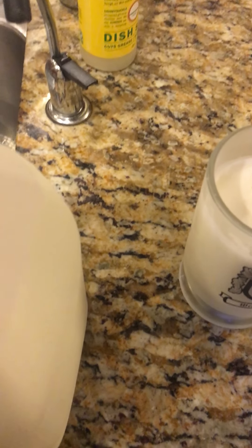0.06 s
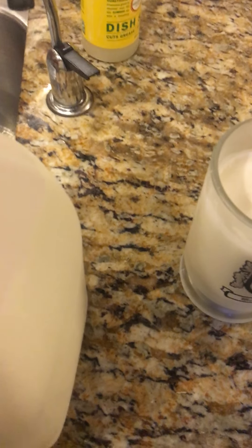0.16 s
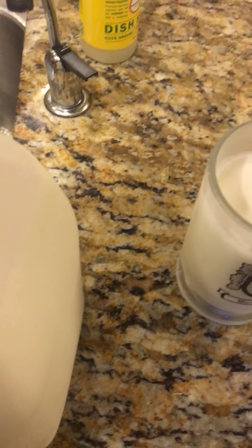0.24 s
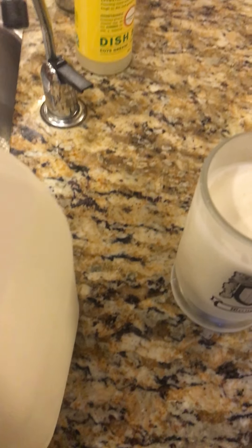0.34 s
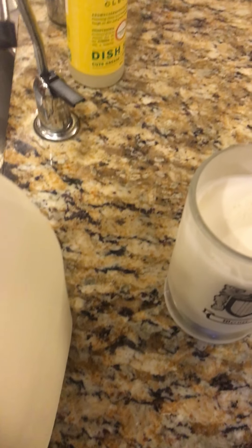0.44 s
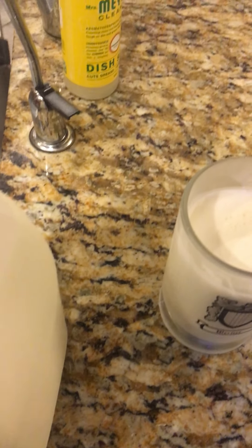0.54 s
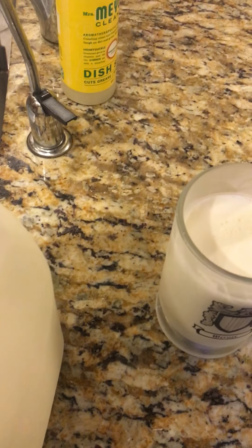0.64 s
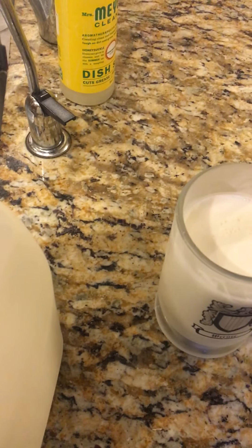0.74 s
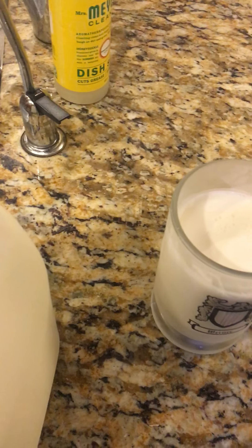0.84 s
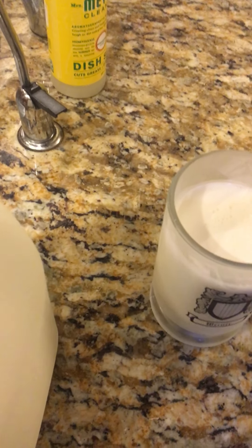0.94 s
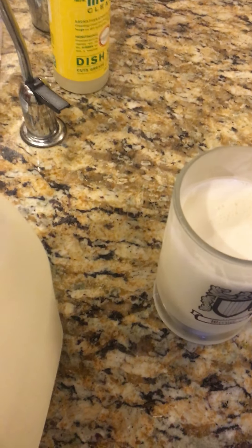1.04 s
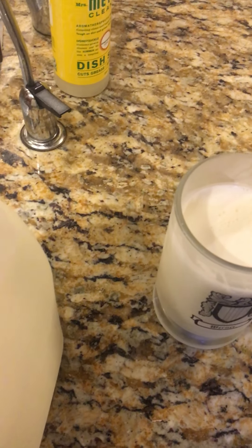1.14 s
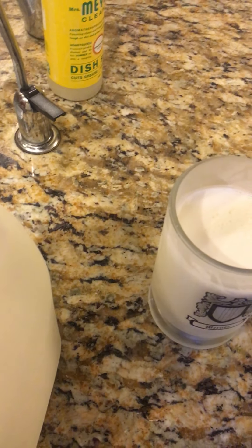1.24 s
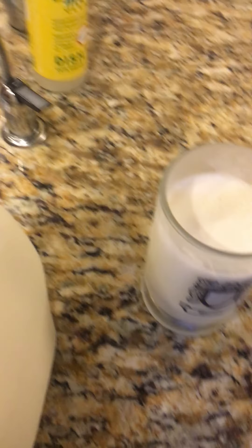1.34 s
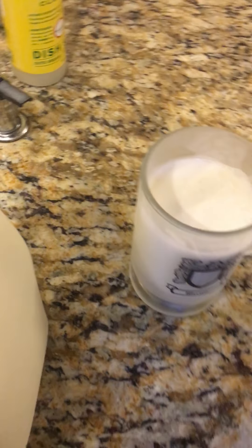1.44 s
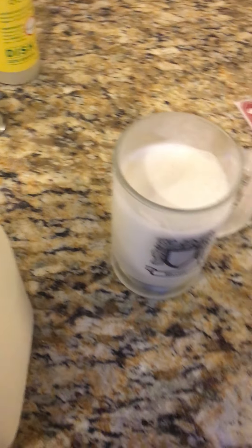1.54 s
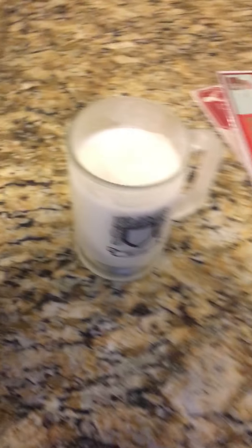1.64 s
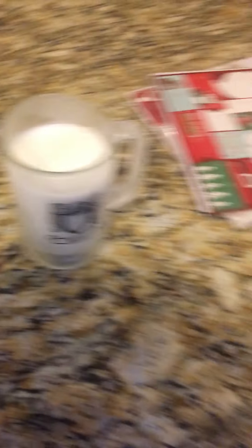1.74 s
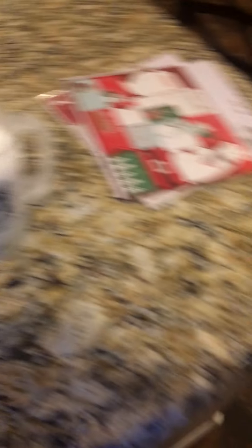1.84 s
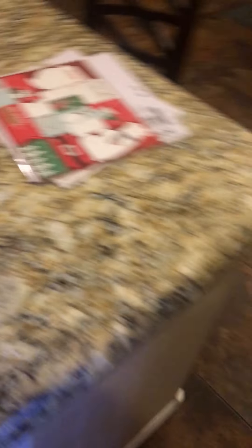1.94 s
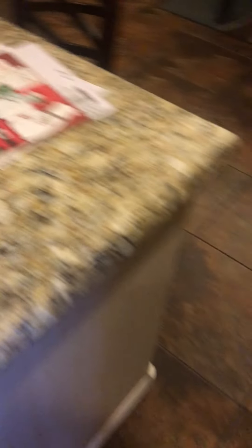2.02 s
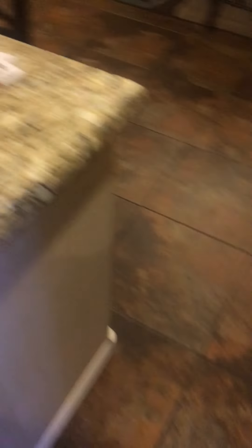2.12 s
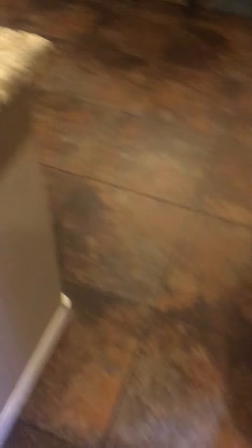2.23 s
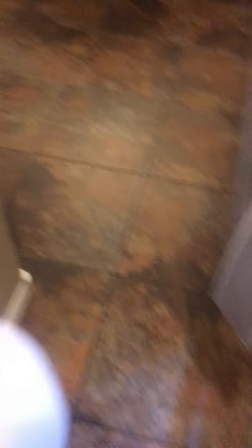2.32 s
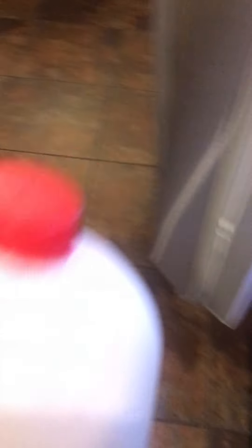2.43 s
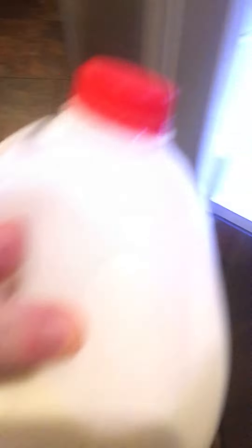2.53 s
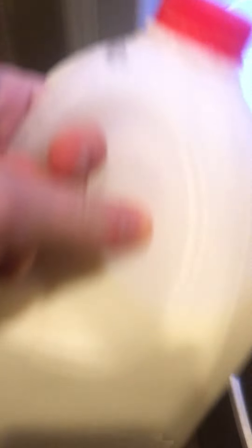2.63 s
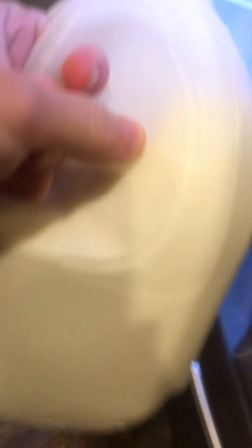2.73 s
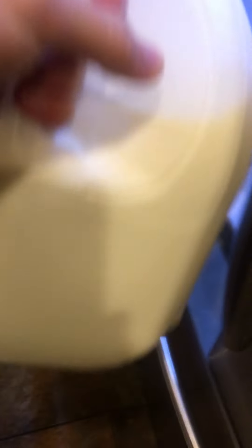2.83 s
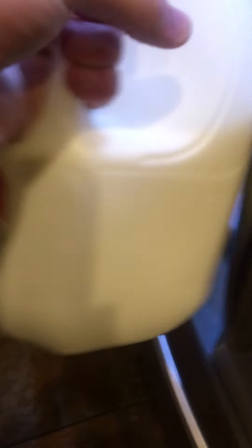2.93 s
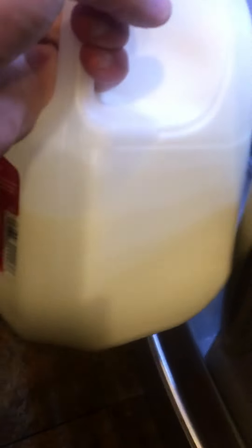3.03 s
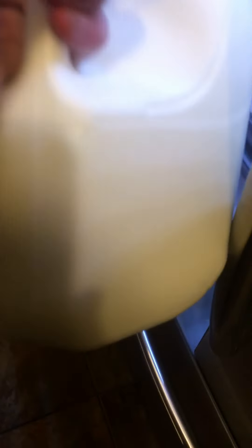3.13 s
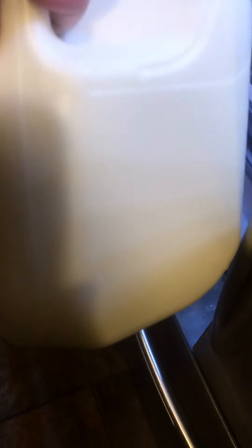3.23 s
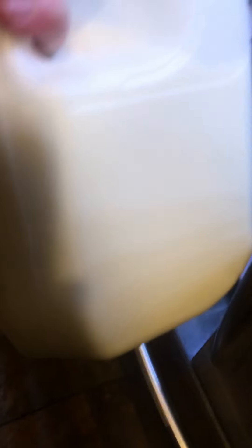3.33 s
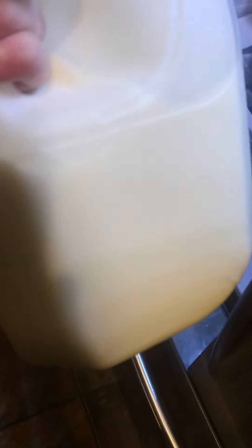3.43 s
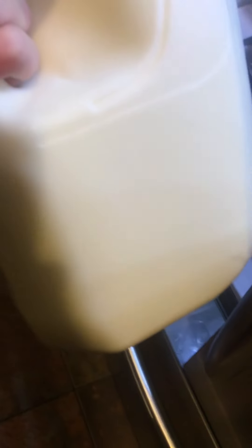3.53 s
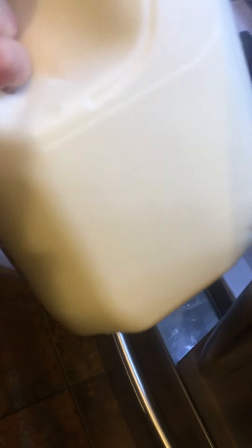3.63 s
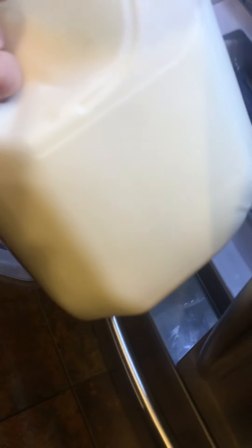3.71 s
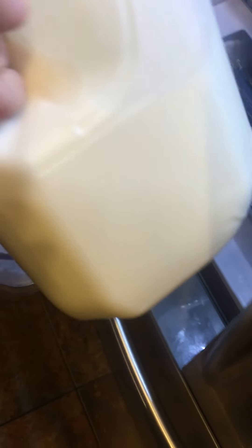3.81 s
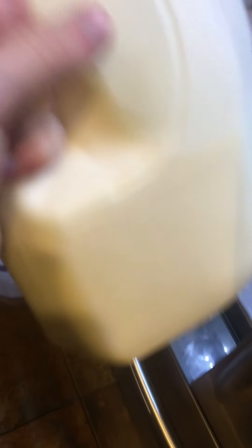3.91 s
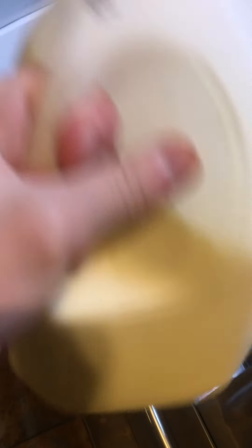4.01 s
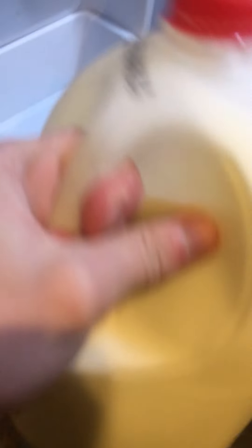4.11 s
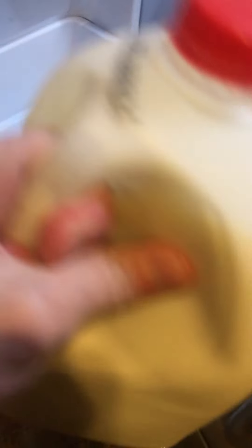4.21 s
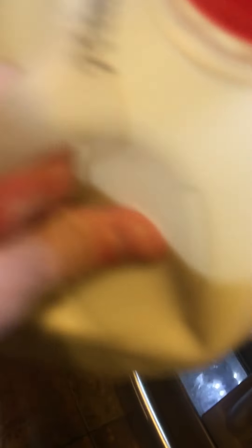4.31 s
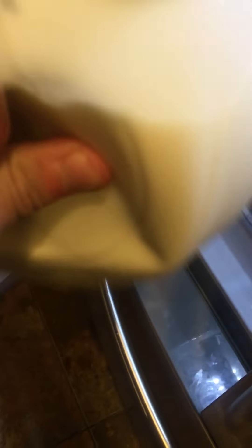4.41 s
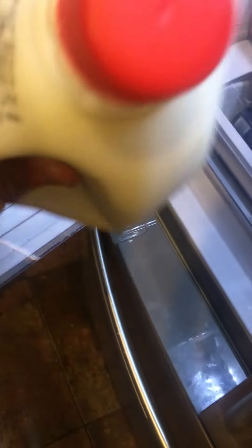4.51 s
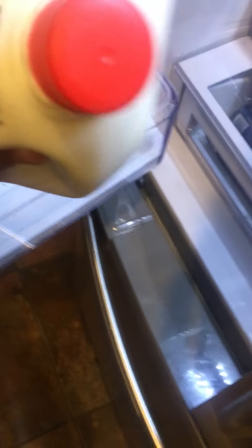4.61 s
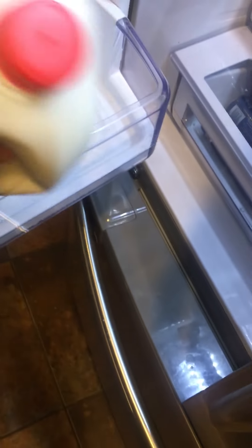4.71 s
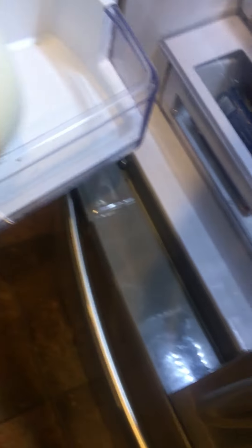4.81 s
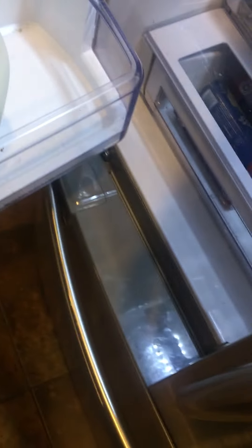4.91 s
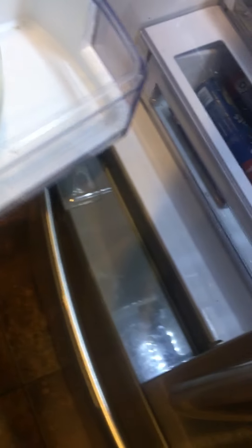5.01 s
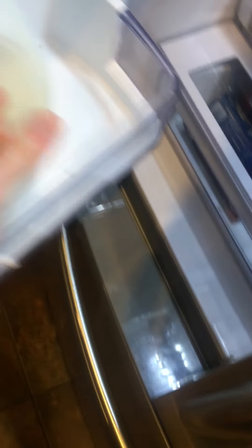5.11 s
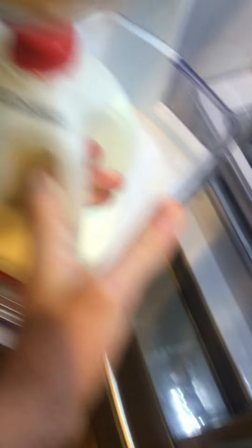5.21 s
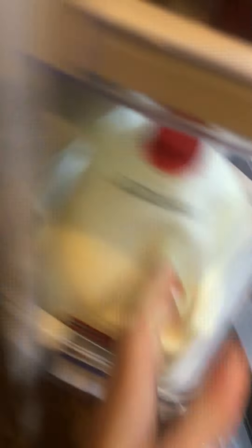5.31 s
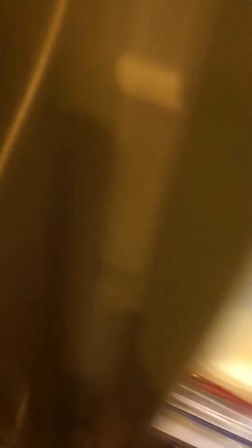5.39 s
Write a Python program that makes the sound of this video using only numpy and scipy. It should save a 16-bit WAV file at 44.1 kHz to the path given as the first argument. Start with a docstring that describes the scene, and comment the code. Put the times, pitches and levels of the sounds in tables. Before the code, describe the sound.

In a kitchen, a plastic milk jug gives one sharp crack as it is capped, followed by faint rubbing and small taps. After a lone hollow pop, loud clusters of knocks and cracks come as the jug is handled and its wall buckles, with one brief squeak. It then scrapes and clatters into a fridge door shelf. Everything is close, over a low hum and some microphone handling rumble.

```python
"""Tiled kitchen: a full plastic milk jug is capped on a stone counter, carried across the room and
shoved into a fridge door shelf. Each knock is a short flurry of contacts that rings jug wall and shelf.
The wall pops and cracks as it buckles; small parts ring and squeak; skin and plastic rub in dense grains.
Behind: a short room tail, a low hum, and rumble from the hand that holds the microphone."""
import sys
import numpy as np
from scipy import signal
from scipy.fft import rfft, irfft, next_fast_len
from scipy.io import wavfile

SR = 44100
rng = np.random.default_rng(int(sys.argv[2]) if len(sys.argv) > 2 else 0)


def store_wav(level_fs):
    """Save 16-bit WAV to argv[1]."""
    pcm = np.round(np.clip(np.atleast_2d(level_fs), -1, 1) * 32767)
    wavfile.write(sys.argv[1], SR, pcm.T.astype(np.int16))


N = 240457

# Hum spectrum: f/Hz, relative density/dB
HUM_SPECTRUM = [(25, -15), (60, 2), (120, 6.5), (250, -24), (500, -29), (1100, -25), (2500, -43),
                (5000, -31.5), (9000, -33.5), (13000, -29.5), (16000, -33.5)]
# Hand jolts on the microphone: t/s, level/dB
HAND_JOLTS = [(.1, -39), (2.0, -56), (2.25, -41), (2.552, -54.5), (2.868, -24.5), (3.2, -39.5), (3.5, -35),
              (4.0, -47), (4.149, -29), (4.6, -38), (4.8, -50), (5.09, -38), (5.28, -41), (5.39, -47)]
# Kitchen decay: f/Hz, t60/s
ROOM_DECAY = [(100, 0.81), (500, 0.5), (1500, 0.45), (4000, 0.45), (12000, 0.3)]
# Wall modes of jug and shelf: f/Hz, width/Hz, relative gain/dB
WALL_MODES = [(172, 39, 10.5), (274.6, 12, 8.5), (377.5, 6.5, 0.5), (601.5, 18, 5), (856, 56, -0.5),
              (1062, 170, 3), (1250, 30, 2), (1538, 25, -6), (2860, 23, -14), (3730, 25, -5),
              (6450, 490, -9.5)]
# Brushes of skin and cloth: t/s, length/s, scrape/dB, hiss/dB
BRUSH_STROKES = [(0.038, 0.063, -88, -51.5), (0.304, 0.12, -53.5, -72.5), (0.546, 0.05, -54.5, -60),
                 (0.615, 0.12, -56, -61.5), (0.818, 0.015, -61, -59.5), (1.047, 0.051, -63, -61),
                 (1.11, 0.18, -63, -65.5), (1.245, 0.19, -51.5, -49), (1.431, 0.051, -56, -56),
                 (1.579, 0.068, -54.5, -50.5), (1.637, 0.24, -50.5, -50.5), (1.713, 0.064, -62, -51),
                 (2.009, 0.047, -51.5, -54), (2.402, 0.038, -77, -60), (2.697, 0.081, -58, -58),
                 (4.692, 0.13, -30, -32), (5.054, 0.083, -54, -41.5)]
# Rubbing and sliding envelope: t/s, scrape/dB, rumble/dB
RUB_LEVELS = [(0.0, -60, -63.5), (0.12, -44, -58.5), (0.24, -46.5, -64), (0.41, -59.5, -66),
              (1.02, -77.5, -66.5), (1.64, -63, -64.5), (1.99, -69, -60.5), (2.28, -71, -62),
              (2.41, -57.5, -64.5), (2.7, -76.5, -70.5), (2.91, -60, -61.5), (3.03, -44, -33.5),
              (3.07, -35.5, -36), (3.23, -54, -41), (3.55, -54, -53), (3.76, -48.5, -43.5),
              (3.98, -49, -41), (4.14, -51, -34), (4.36, -61.5, -62.5), (4.6, -89, -68), (4.78, -33.5, -31),
              (4.89, -31, -31.5), (4.98, -35.5, -29.5), (5.18, -45.5, -40), (5.34, -48.5, -42),
              (5.45, -62, -58)]
# Rubbing hiss spectrum: f/Hz, relative density/dB
HISS_SPECTRUM = [(1800, -49.5), (3000, 8), (5000, 3.5), (8000, -7.5), (12000, -3.5), (15500, -12)]
# Rings and squeaks of small parts: t/s, f/Hz, level/dB, length/s, t60/s
PART_RINGS = [(.655, 910, -47, .03, .2), (1.59, 1230, -47, .04, .2), (2.9, 2088, -18, .062, .6),
              (3.015, 2088, -35, .03, .5), (4.4, 2686, -67, .12, 3.0), (4.568, 490, -40, .02, .2),
              (4.64, 662, -42, .035, .25), (5.233, 1170, -25, .024, .2)]
# Cracks of the plastic: t/s, level/dB, centre f/Hz
PLASTIC_CRACKS = [(.0927, -9, 7000), (.531, -55, 8000), (.5846, -40, 6000), (.601, -46, 7000),
                  (.6913, -47, 7000), (.8345, -42, 3500), (.857, -46, 4000), (2.857, -42, 8000),
                  (2.875, -18, 7000), (2.912, -22, 5000), (2.9671, -15, 4000), (3.0524, -24, 4500),
                  (3.106, -30, 9000), (3.1182, -25, 8800), (3.1302, -23, 4000), (3.5062, -23, 4500),
                  (3.5421, -30, 2200), (3.5576, -32, 6000), (4.047, -22, 5500), (4.249, -37, 6400),
                  (4.4047, -48, 6000), (4.746, -24, 4000), (4.8455, -18, 9000), (4.8829, -22, 4000),
                  (4.9068, -24, 7000), (4.9405, -18, 6000), (5.025, -30, 2500), (5.091, -26, 2500),
                  (5.1114, -36, 7000)]
# Buckling pops of the jug wall: t/s, level/dB, f/Hz, t60/s
WALL_POPS = [(0.835, -41.5, 1530, 0.025), (2.25, -10, 785, 0.028), (2.248, -16.5, 1500, 0.045),
             (2.25, -18, 486, 0.044), (2.249, -20, 2150, 0.03), (2.249, -26, 2750, 0.03),
             (2.553, -29.5, 880, 0.016), (3.49, -21.5, 332, 0.047), (3.507, -20.5, 743, 0.0285),
             (3.977, -8, 688, 0.065), (3.98, -10, 480, 0.087), (3.979, -9.5, 2974, 0.037),
             (5.089, -22.5, 421, 0.081), (2.894, -2, 966, 0.022), (2.913, -14.5, 261, 0.075),
             (3.116, -18, 280, 0.09), (3.217, -17, 400, 0.061), (3.84, -24, 349, 0.11),
             (4.021, -7, 416, 0.06), (4.051, -8.5, 1145, 0.034), (4.064, -18.5, 1077, 0.067),
             (4.548, -25, 876, 0.034), (4.235, -27, 1040, 0.056), (4.116, -17, 241.6, 0.1),
             (4.136, -3, 1075, 0.0081), (4.205, -20, 237, 0.17), (4.861, -12.5, 184, 0.085),
             (4.958, -19, 313, 0.077)]
# Knocks: t/s, level/dB, thud/dB, snap/dB, tick/dB (these three re level), base t60/s
JUG_KNOCKS = [(0.0945, -3, -26, -5, -17, 0.054), (0.537, -49.5, -24, -12, -10, 0.075),
              (0.586, -40.5, -25, 1.5, -3.5, 0.034), (0.598, -50, -9, -8, -4.5, 0.063),
              (0.692, -51, -7, -6.5, -7, 0.056), (0.836, -34.5, -34, -3, -24, 0.029),
              (0.857, -55, -12, 5, -3, 0.046), (0.948, -46.5, -17, 5.5, -12, 0.042),
              (1.308, -33, -19, -5, -20, 0.051), (1.505, -38, -9, 3.5, -11.5, 0.056),
              (1.541, -37.5, -14, -4, -25, 0.045), (1.789, -34, -21.5, -7, -27, 0.074),
              (1.831, -37, -18.5, 3.5, -14.5, 0.035), (2.25, -15, -6, -34, -43.5, 0.029),
              (2.553, -29.5, -8.5, -1, -8, 0.019), (2.866, -26.5, -3, -6, -18, 0.14),
              (2.874, -8.5, -8.5, -5.5, -10, 0.053), (2.893, -13, -11, -4, -15, 0.098),
              (2.91, -10.5, 0.5, -8, -26, 0.13), (2.963, -3.5, -14, -5.5, -19, 0.096),
              (2.984, -13.5, -5, -7, -13, 0.072), (3.053, -16, -18, -6, -19.5, 0.1),
              (3.132, -20.5, -4, 0, -15, 0.072), (3.155, -23, -20, -3.5, -14, 0.075),
              (3.212, -26, -5.5, -9, -23, 0.083), (3.382, -39.5, -2, -5, -15, 0.072),
              (3.49, -20.5, -11.5, -8, -33, 0.048), (3.506, -17.5, -20, -4.5, -23, 0.057),
              (3.543, -29, -10, -6, -28, 0.056), (3.557, -32, -11, 4.5, -11, 0.078),
              (3.839, -27, -1, -9, -26, 0.049), (3.975, 0, -14, -6.5, -21.5, 0.063),
              (4.013, -14, -5.5, -6, -24, 0.077), (4.045, -13, -37, -0.5, -26.5, 0.056),
              (4.093, -31, -12, -21, -21, 0.032), (4.113, -26.5, 2.5, -4, -7.5, 0.073),
              (4.14, -32.5, 4.5, -14, -26, 0.024), (4.198, -40.5, 11.5, 9.5, -1.5, 0.065),
              (4.223, -30, -1.5, -3, -12, 0.045), (4.238, -21, -5, -19, -29, 0.052),
              (4.249, -28.5, -3, -18, -19, 0.051), (4.281, -34.5, -6, -2, -13.5, 0.088),
              (4.366, -52.5, 6, -6, -0.5, 0.056), (4.384, -45, -4.5, 10, 0.5, 0.04),
              (4.444, -50.5, -1, -8.5, -13, 0.039), (4.515, -60, 1.5, 10, 0, 0.11),
              (4.546, -33, -11.5, -2.5, -32.5, 0.059), (4.564, -38, -2.5, 6, -11, 0.055),
              (4.612, -28, -9, -1.5, -18, 0.043), (4.636, -35.5, -21, 1.5, -18, 0.066),
              (4.696, -28.5, -4, 5, -5, 0.056), (4.849, -7.5, -4.5, -7, -13, 0.054),
              (4.885, -13.5, -8, 2.5, -15, 0.044), (4.909, -15, -2.5, -13, -12.5, 0.049),
              (4.933, -8, -6, -6.5, -17.5, 0.069), (4.955, -7.5, -6.5, -10, -19, 0.076),
              (4.984, -14.5, -11, -20, -22, 0.053), (5.023, -22.5, 4, -4, -19, 0.052),
              (5.091, -20, -3, -9, -22, 0.061), (5.122, -27, -18, -19, -22, 0.064),
              (5.235, -33, -5.5, -2, -16, 0.17), (5.266, -28, -6, 3, -2, 0.084),
              (5.298, -27.5, -14.5, -1.5, -19, 0.065), (5.344, -36.5, -5, -1, -10, 0.069),
              (5.396, -27, -1, -9, -22, 0.04), (5.408, -34.5, -20, -1, -6.5, 0.037)]
# Microphone response: f/Hz, gain/dB
MIC_RESPONSE = [(20, -15), (45, 0), (120, -1.5), (3000, -4.5), (4900, -7), (5800, 0), (7400, -1.5),
                (8500, 0), (10500, -6), (12500, -5), (15500, -7)]


def from_db(db):
    """dB to gain."""
    return 10 ** (np.asarray(db) / 20)


def unit_rms(x):
    """Scale to rms 1."""
    return x / np.sqrt(np.mean(x ** 2) + 1e-20)


def at_hz(table, hz):
    """Interpolate an (f/Hz, value) table over log frequency."""
    table_hz, values = np.transpose(table)
    return np.interp(np.log(hz + 1), np.log(table_hz), values)


def band(x, low_hz, high_hz):
    """Causal band-pass; keeps the rms of white noise."""
    sos = signal.butter(3, [low_hz, high_hz], "band", fs=SR, output="sos")
    return signal.sosfilt(sos, x + 1e-18) * np.sqrt(SR / 2 / (high_hz - low_hz))


def coloured(x, spectrum):
    """Zero-phase filter from an (f/Hz, gain/dB) table."""
    size = next_fast_len(N)
    gain = from_db(at_hz(spectrum, np.fft.rfftfreq(size, 1 / SR)))
    return irfft(rfft(x, size) * gain, size)[:N]


def resonance(x, hz, width_hz):
    """One mode, peak gain 1."""
    r = np.exp(-np.pi * width_hz / SR)
    feedback = [1, -2 * r * np.cos(2 * np.pi * hz / SR), r * r]
    return signal.lfilter(np.array([1, 0, -1]) * (1 - r * r) / 2, feedback, x)


def grains(shape, per_s, spread_db):
    """Random contacts of uneven size and sign; rms 1."""
    sizes = from_db(spread_db * np.minimum(rng.exponential(1, shape), 4))
    signs = rng.choice([-1, 1], shape)
    return unit_rms(sizes * signs * (rng.random(shape) < per_s / SR))


def hum(level_db=-59):
    """Steady noise, strongest near 120 Hz."""
    return from_db(level_db) * unit_rms(coloured(rng.standard_normal(N), HUM_SPECTRUM))


def hand_rumble(rise_s=.033, t60_s=.6):
    """Low noise on the microphone; swells and settles with each jolt of the hand."""
    t, envelope = np.arange(N) / SR, 0
    for start_s, level_db in HAND_JOLTS:
        age_s = np.maximum(t - start_s, 0)
        envelope += from_db(level_db - 60 * age_s / t60_s) * (1 - np.exp(-age_s / rise_s))
    return envelope * unit_rms(band(band(rng.standard_normal(N), 44, 130), 41, 160))


def kitchen_reverb(x, gain_db=-42, build_s=.008):
    """Diffuse tail: half-octave noise bands, each with its own t60."""
    t, tail = np.arange(SR) / SR, 0
    edges_hz = 60 * 2 ** np.arange(0, 8.4, .5)
    white = rng.standard_normal((2, SR))
    for k, (low_hz, high_hz) in enumerate(zip(edges_hz, edges_hz[1:])):
        sos = signal.butter(2, [low_hz, high_hz], "band", fs=SR, output="sos")
        t60_s = at_hz(ROOM_DECAY, np.sqrt(low_hz * high_hz))
        tail += signal.sosfilt(sos, white[k % 2]) * from_db(-60 * t / t60_s)
    onset = np.clip(t / build_s, 0, 1) ** 2
    return from_db(gain_db) * signal.fftconvolve(x, tail * onset)[:N]


def walls(x, modes_db):
    """Direct sound plus the jug and shelf modes it excites."""
    return x + sum(from_db(gain_db + modes_db) * resonance(x, hz, width_hz)
                   for hz, width_hz, gain_db in WALL_MODES)


def brush_envelopes():
    """Scrape and hiss gains; each brush of skin or cloth swells and fades."""
    t, gains = np.arange(N) / SR, 0
    for start_s, length_s, *levels_db in BRUSH_STROKES:
        progress = np.clip((t - start_s) / length_s, 0, 1)
        gains += from_db(levels_db)[:, None] * np.sin(np.pi * progress ** .77)
    return gains


def rubbing():
    """Stick-slip under the fingers and along the shelf: clumped grains over a rumble."""
    t = np.arange(N) / SR
    times_s, *curves_db = np.transpose(RUB_LEVELS)
    scrape_db, rumble_db = [np.interp(t, times_s, curve) for curve in curves_db]
    hiss_db = -52 + .98 * (scrape_db + 45)   # tracks the scrape
    brush_scrape, brush_hiss = brush_envelopes()
    clumps = from_db(1.32 * unit_rms(band(rng.standard_normal(N), 20, 56)))
    coarse, fine = clumps * grains((2, N), per_s=6000, spread_db=4.5)
    dulled = signal.lfilter([.35], [1, -.8], coarse)
    scrape = (from_db(scrape_db) + brush_scrape) * band(dulled, 820, 3240)
    rumble = from_db(rumble_db) * band(rng.standard_normal(N), 45, 480)
    hiss = (from_db(hiss_db) + brush_hiss) * unit_rms(coloured(fine, HISS_SPECTRUM))
    return scrape + rumble + hiss


def rings(attack_s=.005, release_s=.004):
    """Small parts ring and squeak: decaying sines, damped after a set length."""
    t, out = np.arange(N) / SR, 0
    for start_s, hz, level_db, length_s, t60_s in PART_RINGS:
        age_s = np.maximum(t - start_s, 0)
        gate = np.clip(age_s / attack_s, 0, 1) * np.clip((length_s - age_s) / release_s, 0, 1)
        out += from_db(level_db - 60 * age_s / t60_s) * gate * np.sin(2 * np.pi * hz * age_s)
    return out


def cracks(rise_s=.0005, t60_s=.014, edge_ratio=1.8):
    """Plastic cracks: noise bursts of a few ms, each in its own wide band."""
    size = SR // 25
    t, out = np.arange(size) / SR, np.zeros(N + size)
    envelope = from_db(-60 * t / t60_s) * (1 - np.exp(-t / rise_s))
    for start_s, level_db, hz in PLASTIC_CRACKS:
        burst = band(rng.standard_normal(size) * envelope, hz / edge_ratio, min(hz * edge_ratio, .4 * SR))
        at = round(start_s * SR)
        out[at:at + size] += from_db(level_db) * burst / np.abs(burst).max()
    return out[:N]


def pops():
    """A buckling panel springs over in one swing and rings a few cycles."""
    t, out = np.arange(N) / SR, 0
    for start_s, level_db, hz, t60_s in WALL_POPS:
        age_s = np.maximum(t - start_s, 0)
        attack = 1 - np.exp(-age_s * hz * 5.9)
        out += from_db(level_db - 60 * age_s / t60_s) * attack * np.sin(2 * np.pi * hz * age_s)
    return out


def knocks(counter_hz=1310, fridge_hz=950, fridge_from_s=2.5, edge_ratio=1.91):
    """Dying flurries of contacts in four registers; lows swell later and last longer than highs."""
    size, count = SR // 4, len(JUG_KNOCKS)
    t = np.arange(size) / SR
    flurries = np.abs(grains((count, size), per_s=7000, spread_db=3))
    signs = rng.choice([-1, 1], (count, 4, size))   # same contacts, own signs per register
    detunes = np.exp(.1 * rng.uniform(-1.07, 1, count))   # the struck spot shifts the note
    decay_ratios = np.array([[1], [2.17], [.92], [.93]])   # note, thud, snap, tick
    rise_ratios = np.array([[.06], [.059], [.03], [.015]])
    registers = np.zeros((4, N + size))
    for knock, flurry, sign, detune in zip(JUG_KNOCKS, flurries, signs, detunes):
        start_s, level_db, *offsets_db, t60_s = knock
        gains = from_db(level_db + np.array([0, *offsets_db]))[:, None]
        decay = from_db(-60 * t / (t60_s * decay_ratios))
        attack = 1 - np.exp(-t / (t60_s * rise_ratios))
        hit = gains * decay * attack * flurry * sign
        hz = detune * (counter_hz if start_s < fridge_from_s else fridge_hz)
        hit[0] = band(hit[0], hz / edge_ratio, hz * edge_ratio)
        hit[0] += from_db(-6.5) * resonance(hit[0], hz, hz / 6.5)   # hollow ring
        at = round((start_s - .002) * SR)
        registers[:, at:at + size] += hit
    note, thud, snap, tick = registers[:, :N]
    note = signal.sosfilt(signal.butter(4, 3000, fs=SR, output="sos"), note)
    snap = signal.lfilter([.4], [1, -.7], snap)   # plastic gives less towards the treble
    return note + band(thud, 130, 560) + band(snap, 1600, 4990) + band(tick, 4400, 15000)


def scene():
    """Jug and shelf close by, room and hum behind; mono."""
    struck = walls(knocks(), modes_db=-7) + pops() + cracks() + rings()
    rubbed = walls(rubbing(), modes_db=-9.5)
    background = hum() + kitchen_reverb(struck) + hand_rumble()
    return (background + rubbed + struck)[None]


def record(dry):
    """Microphone response, soft clip, steep low-pass."""
    ceiling, stopband_hz = .74, 16300
    heard = coloured(dry[0], MIC_RESPONSE)
    clipped = ceiling * np.tanh(heard / ceiling)
    return signal.sosfilt(signal.cheby2(16, 60, stopband_hz, fs=SR, output="sos"), clipped)[None]


dry = scene()
out = record(dry)
store_wav(out)
```